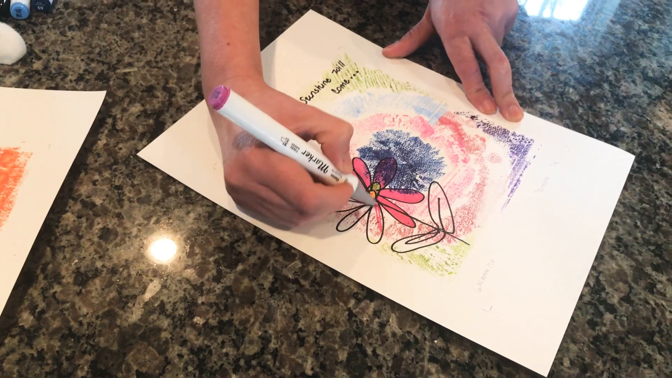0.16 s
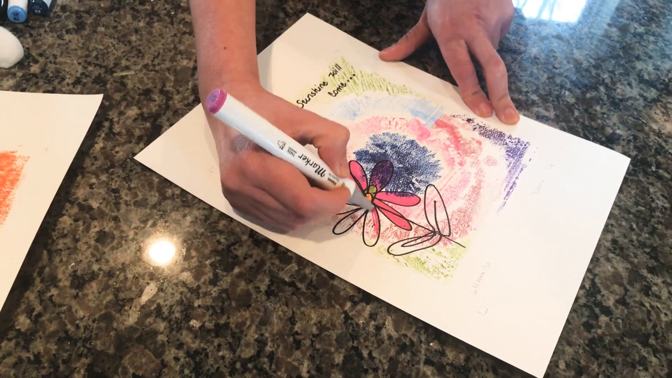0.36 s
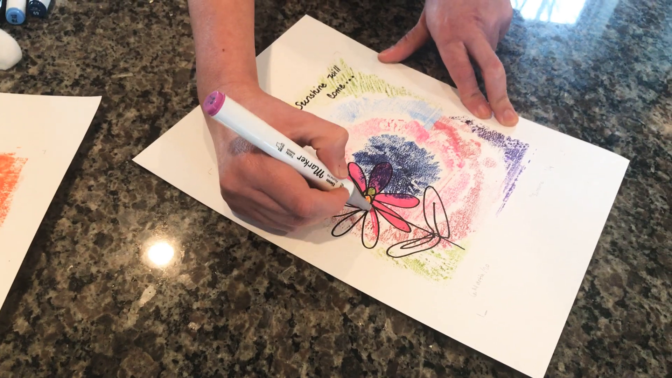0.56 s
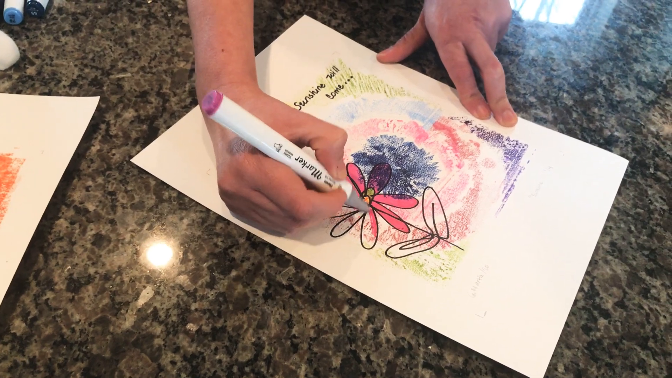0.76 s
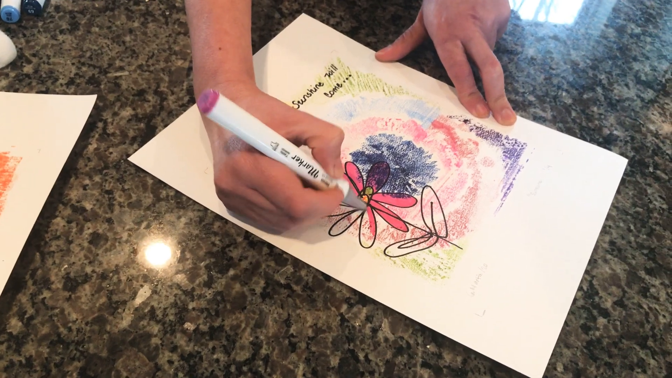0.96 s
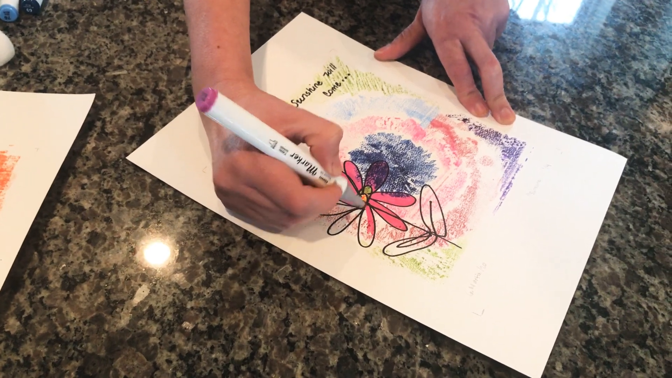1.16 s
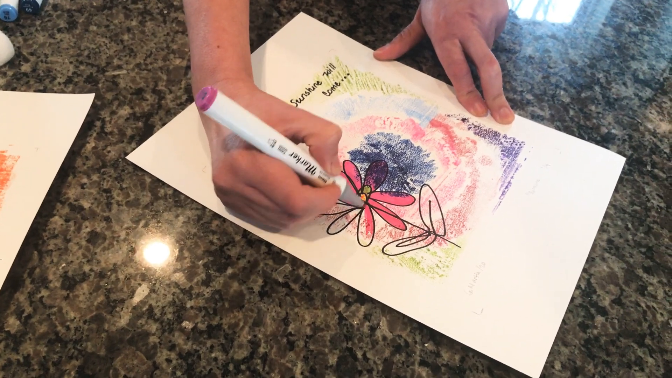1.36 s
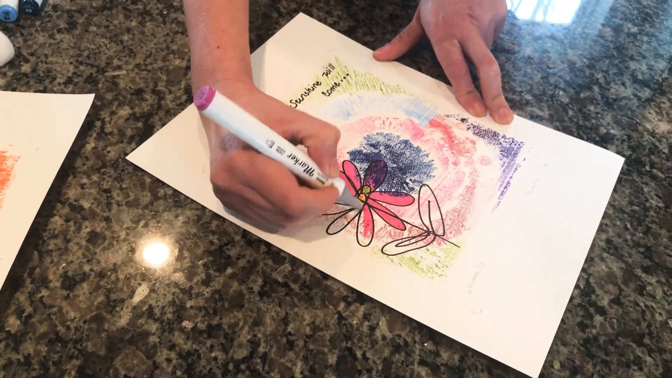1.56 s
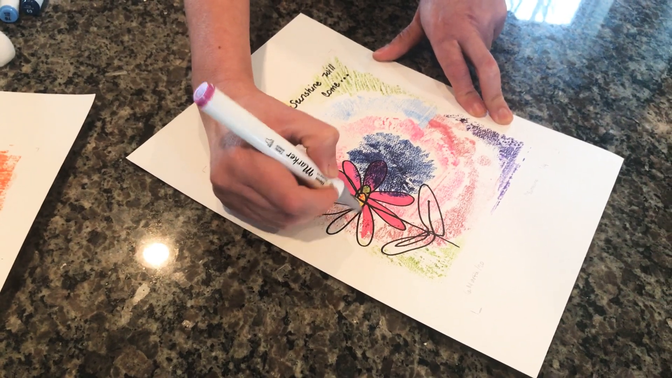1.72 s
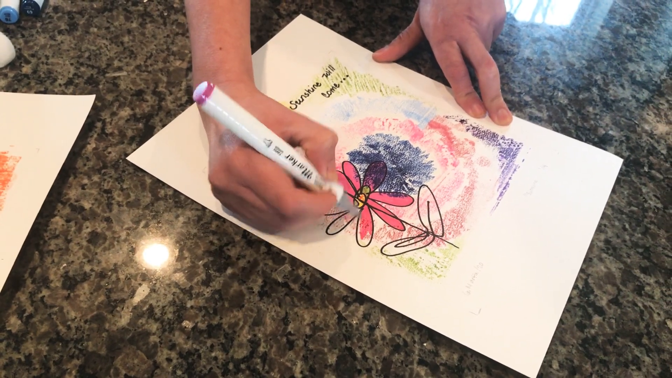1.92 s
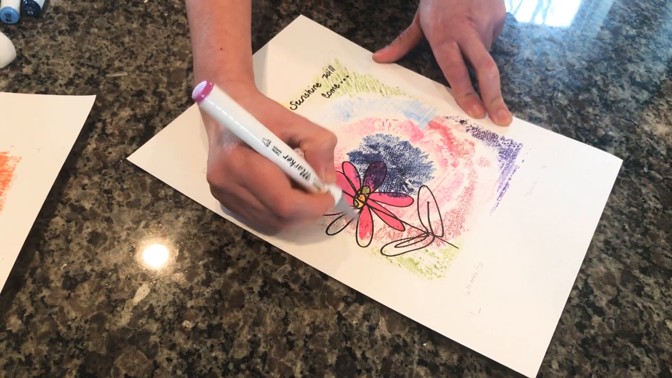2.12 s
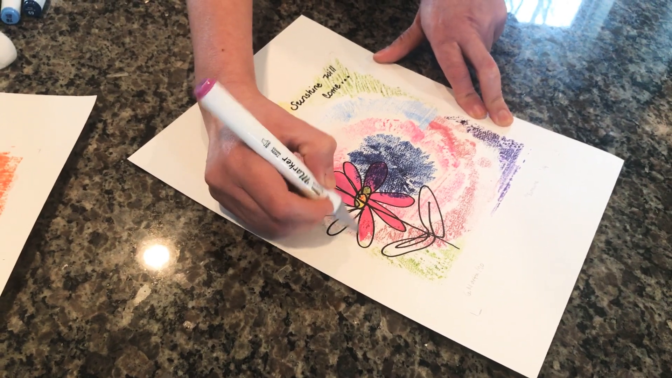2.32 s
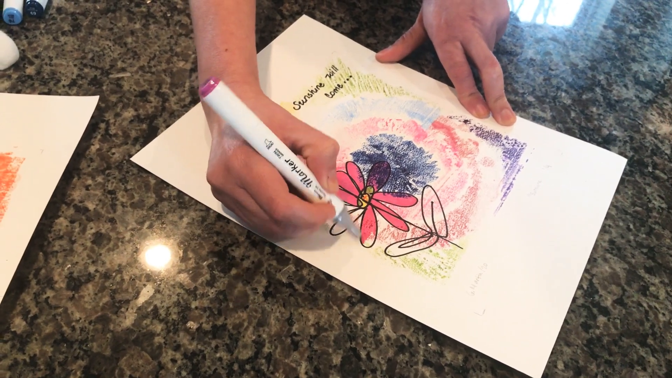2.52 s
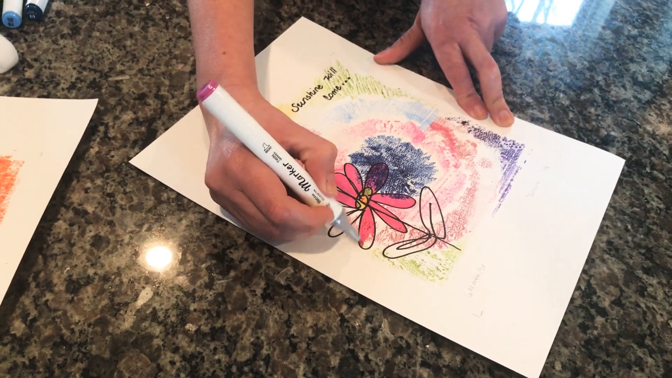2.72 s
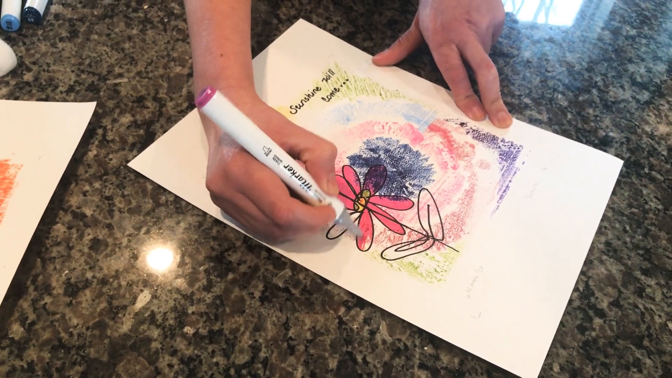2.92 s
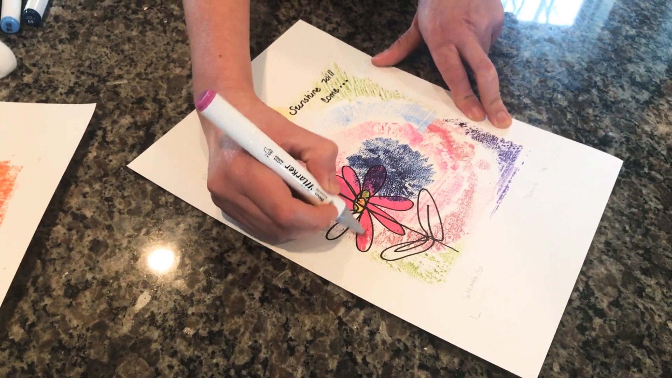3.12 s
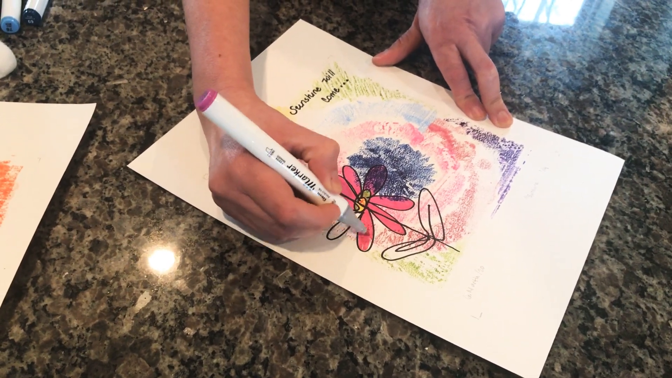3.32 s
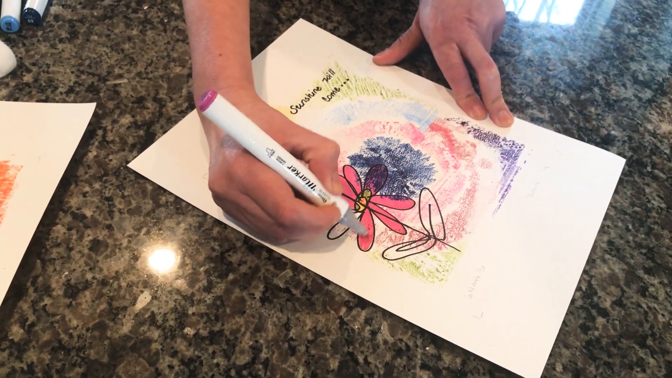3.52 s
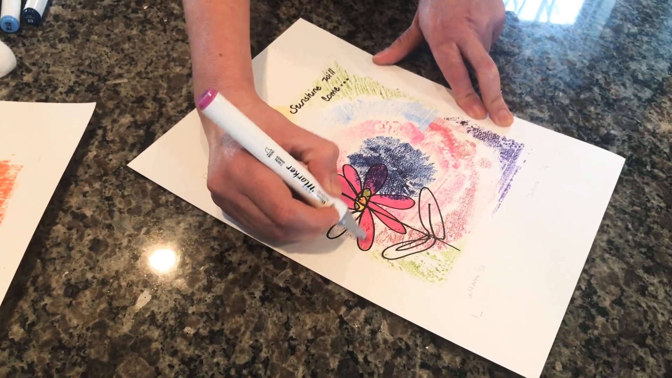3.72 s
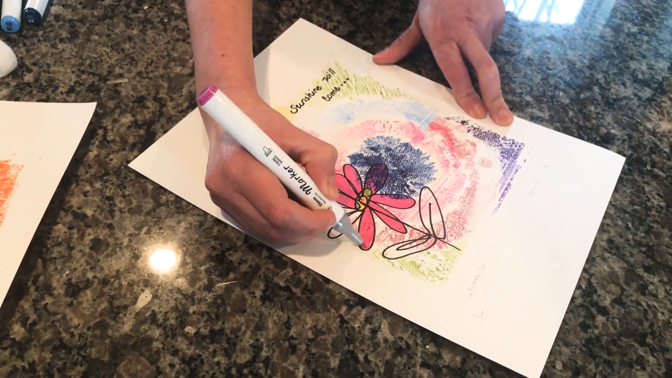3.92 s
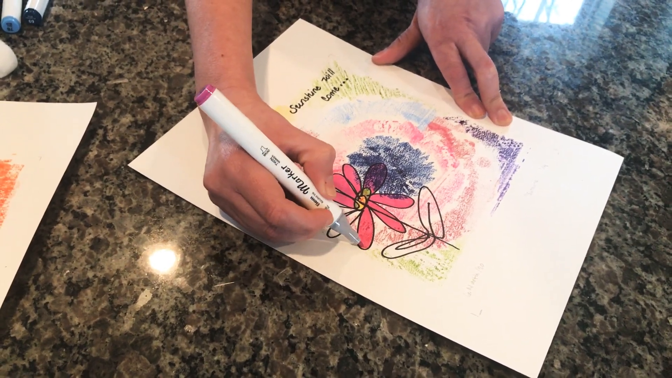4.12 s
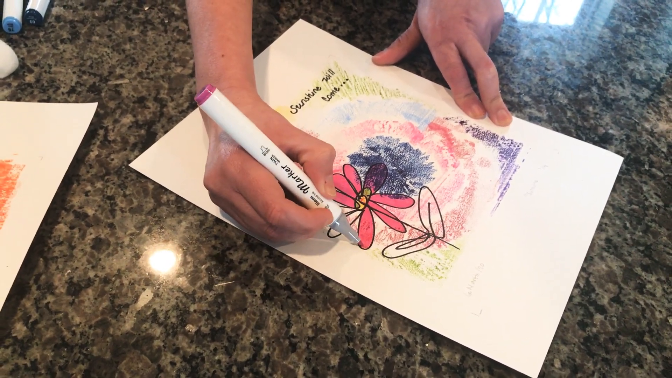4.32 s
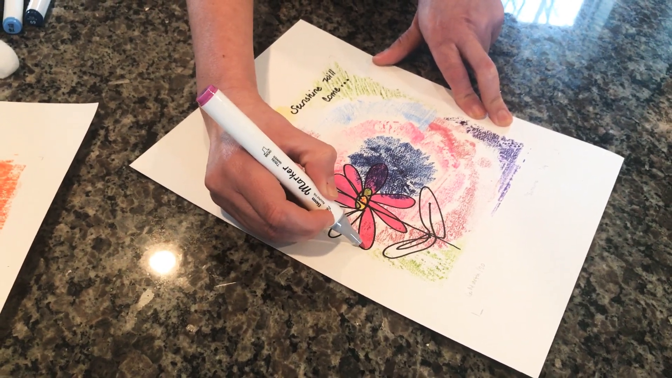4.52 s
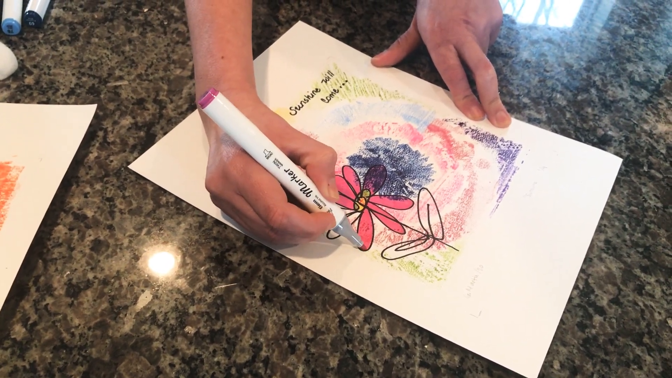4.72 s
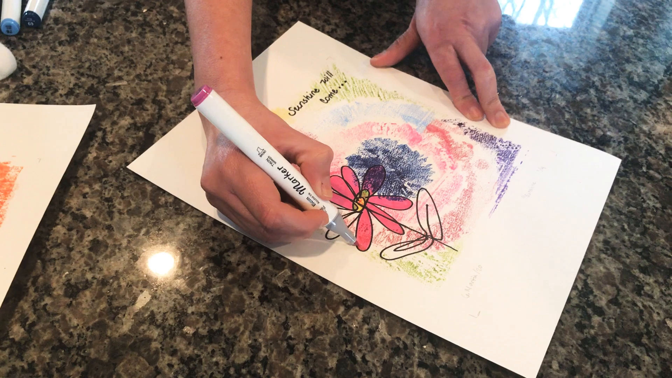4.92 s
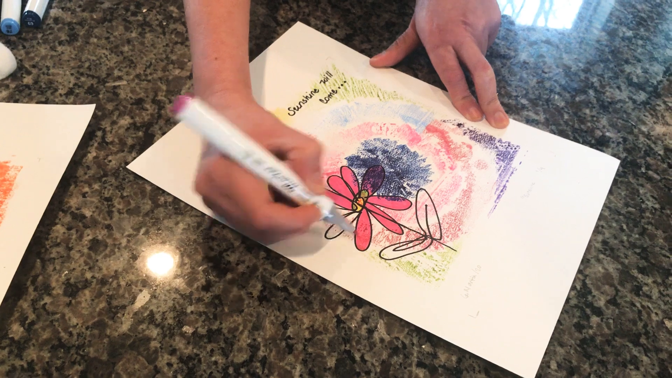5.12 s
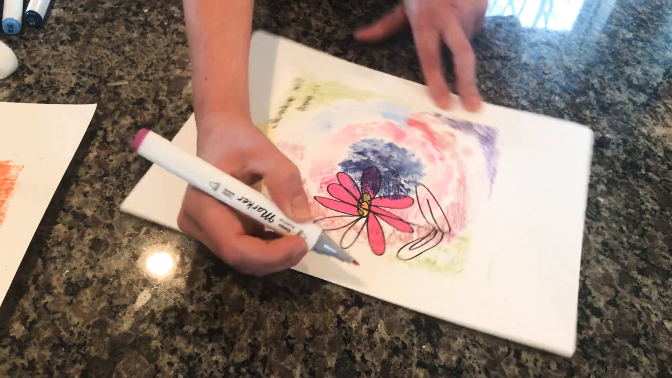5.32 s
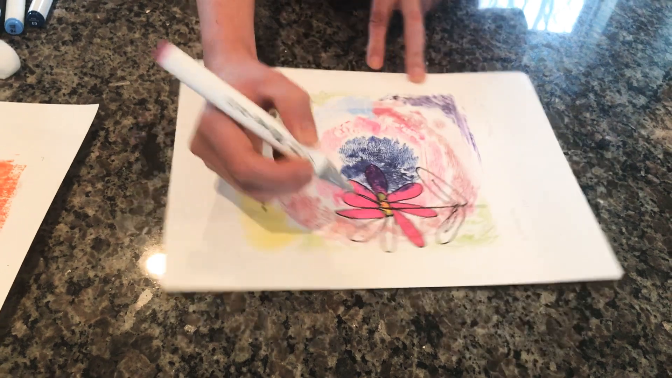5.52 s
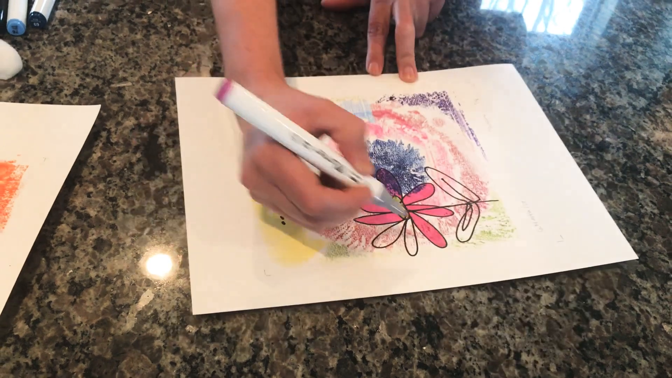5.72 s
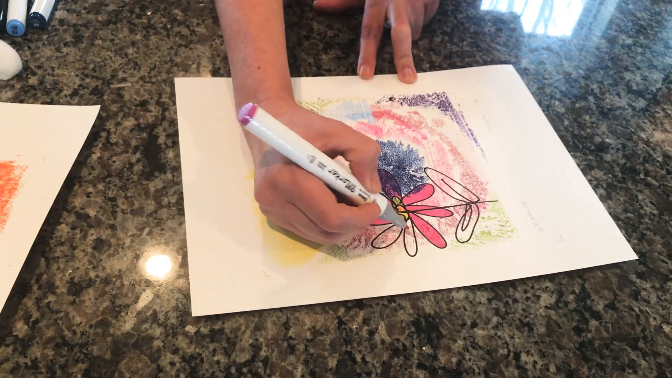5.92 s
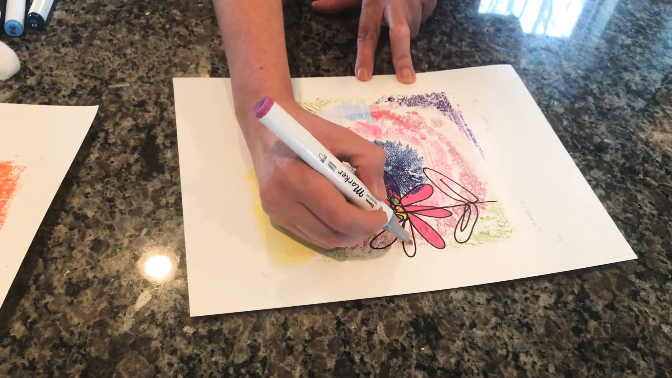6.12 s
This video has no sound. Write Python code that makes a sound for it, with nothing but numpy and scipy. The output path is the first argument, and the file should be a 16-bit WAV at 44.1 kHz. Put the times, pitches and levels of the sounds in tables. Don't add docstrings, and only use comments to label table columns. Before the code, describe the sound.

Close to the microphone in a quiet room, a felt-tip marker rubs paper on a stone counter in fast, even back-and-forth strokes, bright and scratchy. The strokes soften, then give way to faint separate dabs. The sheet is turned with a short rubbing swish and thin whistle, the tip lands with a crisp tap, and the paper settles before a last few tiny touches. A very faint watch ticks over soft hiss.

```python
import sys
import numpy as np
from scipy import signal
from scipy.fft import rfft, irfft
from scipy.io import wavfile

SR = 44100
rng = np.random.default_rng(int(sys.argv[2]) if len(sys.argv) > 2 else 0)


def volts(x):
    e = np.asarray(x, float) / 20
    return 10 ** e


def bounce(signal):
    frames = np.transpose(np.atleast_2d(signal))
    limited = np.clip(frames, -1, 1)
    pcm = np.round(limited * 32767).astype(np.int16)
    wavfile.write(sys.argv[1], SR, pcm)


N = 276066

# freq_hz, density_db
ROOM_COLOUR = [(22, -20.5), (53, 2), (123, -4), (248, -7.5), (370, -7.5), (470, -13.5), (802, -17),
               (949, -17), (1660, -22.5), (3250, -24), (7730, -27.5), (10800, -27.5), (16000, -24.5)]
# freq_hz, width_hz, rms_db
WHINES = [(120, 6, -82), (195, 30, -86)]
# start_s, length_s, ring_db, sag_db, hiss_over_ring_db
OUT_STROKES = [(0.049, 0.089, -43.5, 15.5, -5), (0.265, 0.086, -45.3, 12.5, -5),
               (0.472, 0.079, -43, 15.5, -9.1), (0.676, 0.067, -46, 11, -6),
               (0.849, 0.087, -42.5, 12.5, -7.5), (1.047, 0.09, -42, 1, -5.5),
               (1.262, 0.093, -41, -1.5, -6.5), (1.47, 0.091, -42, 11.5, -6), (1.671, 0.097, -44, 15.5, -6),
               (1.878, 0.1, -43.5, 15.7, -6.5), (2.082, 0.095, -43.5, 5, -7), (2.296, 0.099, -42.5, 8, -8),
               (2.507, 0.11, -45.5, 19, -9.5), (2.714, 0.1, -52.5, 28.5, -7.2),
               (2.908, 0.094, -55, 16, -6.5), (3.086, 0.081, -50.4, 22, -9), (3.27, 0.084, -51, 13.5, -7.5),
               (3.45, 0.075, -49.5, 14, -10), (3.624, 0.098, -53.3, 16, -10.5),
               (3.808, 0.082, -51, 10, -13)]
# start_s, length_s, ring_db, sag_db, hiss_over_ring_db
BACK_STROKES = [(-0.05, 0.081, -44, -6, -8), (0.144, 0.095, -47.5, -6, -7.8), (0.361, 0.085, -46, -15, -10),
                (0.565, 0.089, -47, -3, -7.5), (0.746, 0.082, -46.5, -5.8, -7),
                (0.938, 0.086, -45.5, -11, -7.5), (1.14, 0.1, -46.5, -7.8, -9),
                (1.357, 0.092, -44.9, -8.2, -8.7), (1.561, 0.092, -46, -5, -8.5),
                (1.769, 0.093, -45.5, -1, -9), (1.98, 0.088, -48, -5, -7), (2.181, 0.095, -48, -12, -8.0),
                (2.399, 0.086, -48.5, -14, -9.5), (2.612, 0.074, -48.5, -10, -12),
                (2.82, 0.081, -52.5, 15, -13.4), (2.992, 0.073, -48.5, -8, -13),
                (3.175, 0.074, -47.5, -13, -12.1), (3.349, 0.079, -49.4, -7, -13.5),
                (3.519, 0.087, -50.3, -3, -15), (3.713, 0.084, -52, 3, -14)]
# peak_s, rise_s, fall_s, ring_db, hiss_over_ring_db
DABS = [(3.955, 0.11, 0.08, -71.5, 0), (4.037, 0.006, 0.04, -55, -11), (4.102, 0.051, 0.048, -70, 2),
        (4.218, 0.011, 0.053, -59.5, -7), (4.355, .03, 0.054, -83, 5), (4.518, 0.022, .05, -66.5, -3),
        (4.67, .02, 0.048, -74.5, 0), (4.735, .06, 0.056, -75, -4), (4.868, .012, 0.073, -69, 2),
        (4.98, 0.042, .12, -75, -3), (5.056, .035, 0.12, -69.5, -13), (5.128, 0.059, 0.072, -56, -14),
        (6.206, .009, 0.02, -60, -2), (6.245, .007, .04, -57, -9), (6.258, .022, .04, -47.5, -10)]
# freq_hz, width_hz, level_db
BARREL_MODES = [(6010, 480, -8.5), (6516, 230, -5.5), (6950, 203, -1), (7350, 223, -2.5), (8350, 330, -8),
                (8886, 530, -5.5), (9390, 210, -11)]
# freq_hz, width_hz, level_db
PAPER_MODES = [(2840, 720, -4), (3156, 560, -1), (3800, 410, -9.5), (4636, 470, 0.5), (4820, 620, -8.5)]
# freq_hz, density_db
FIBRE_COLOUR = [(9500, -1.5), (10500, -6.5), (11500, -3.5), (13000, -2), (15000, -0.5), (16500, 0.5)]
# freq_hz, density_db
BRUSH_COLOUR = [(3600, -13.5), (4700, -4.5), (5400, -2), (6600, 7), (7800, -0.5), (10000, -9)]
# freq_hz, density_db
COUNTER_COLOUR = [(700, -18.5), (1400, -4.0), (2400, -4.5)]
# centre_s, length_s, level_db
THUMPS = [
    (2.94, .022, -68),
    (5.56, .02, -68),
    (5.62, .03, -68),
]
# freq_hz, density_db
HAND_COLOUR = [(30, -3), (180, -2), (450, -9)]
# time_s, peak_db, centre_hz, t60_s
SNAPS = [(5.299, -52, 12000, 0.0027), (5.429, -49, 8800, 0.0028), (5.907, -50, 9500, 0.0034),
         (5.9105, -40, 4600, 0.013), (5.9107, -46, 21000, .012), (5.9108, -63, 900, .015),
         (5.9133, -46, 5600, 0.01), (4.032, -52, 5000, .02), (4.213, -54, 5600, .05),
         (4.349, -57, 16000, .004), (6.203, -53, 6700, .02), (5.921, -56, 5400, .012),
         (6.0202, -56, 28000, .007)]
# time_s, level_db
SLIDE_SPEED = [
    (5.2, -78),
    (5.292, -69.5),
    (5.3, -62),
    (5.385, -60.5),
    (5.42, -55),
    (5.46, -61),
    (5.535, -61.5),
    (5.56, -61.5),
    (5.72, -78),
]
# freq_hz, density_db
SLIDE_COLOUR = [(2060, -11), (3500, -5), (4860, -7), (5780, -3), (8000, -9.5), (10400, -37), (17600, -120)]
# freq_hz, density_db
AIR_COLOUR = [(7500, -19.5), (8500, -6.0), (12000, -2.0), (16500, -1)]
# freq_hz, density_db
DRAG_COLOUR = [(600, -2), (1000, -1), (2200, -1)]
# freq_hz, width_hz
EDGE_MODES = [(2950, 650), (3250, 190)]
# peak_s, rise_s, fall_s, level_db
SETTLE = [
    (5.93, .01, .25, -74),
    (6.068, .05, .26, -68.5),
]
# freq_hz, density_db
SETTLE_COLOUR = [(530, -16), (900, -6), (1400, -13), (1960, -2.5), (2360, -8), (3850, -5.5), (5210, -12),
                 (6200, -9), (12000, -22.5), (15600, -51), (22000, -120)]

FIRM_DB = -43.5


def rms_one(x):
    return x / np.sqrt(np.mean(x ** 2) + 1e-20)


def noise():
    return rng.standard_normal(N)


def drift(rate_hz):
    r = np.exp(-2 * np.pi * rate_hz / SR)
    slow = signal.lfilter([1], [1, -2 * r, r * r], rng.standard_normal(N + SR))
    return rms_one(slow[SR:])


def coloured(x, spectrum):
    hz, db = np.transpose(spectrum)
    grid = np.maximum(np.fft.rfftfreq(N, 1 / SR), 1)
    gain = volts(np.interp(np.log(grid), np.log(hz), db, -90, -90))
    return rms_one(irfft(rfft(x) * gain, N))


def resonance(x, hz, width_hz):
    r = np.exp(-np.pi * width_hz / SR)
    poles = [1, -2 * r * np.cos(2 * np.pi * hz / SR), r * r]
    return signal.lfilter(np.array([1, 0, -1]) * (1 - r * r) / 2, poles, x)


def narrow_noise(hz, width_hz):
    once = resonance(noise(), hz, width_hz)
    return rms_one(resonance(once, hz, width_hz))


def swell(centre_s, length_s, db):
    return volts(db) * np.exp(-((np.arange(N) / SR - centre_s) / length_s) ** 2)


def touch(peak_s, rise_s, fall_s, db):
    since = np.arange(N) / SR - peak_s
    distance = np.where(since < 0, -since / rise_s, since / fall_s)
    return volts(db - 34 * np.minimum(distance, 3) ** 1.5)


def burst(at_s, peak_db, low_hz, high_hz, t60):
    crack = rng.standard_normal(2000) * volts(-60 * np.arange(2000) / SR / t60)
    band = signal.butter(2, [low_hz, min(high_hz, .45 * SR)], "band", fs=SR, output="sos")
    crack = signal.sosfilt(band, crack)
    out = np.zeros(N)
    out[round(at_s * SR):][:len(crack)] = volts(peak_db) * crack / np.abs(crack).max()
    return out


def room_floor():
    tones = sum(volts(db) * narrow_noise(hz, width) for hz, width, db in WHINES)
    lamp_hz = 10730 + 45 * drift(60)
    lamp = volts(-86.5 + 2.0 * drift(15)) * np.sin(2 * np.pi * np.cumsum(lamp_hz) / SR)
    return volts(-69.5) * coloured(noise(), ROOM_COLOUR) + tones + lamp


def catches(per_s, spread_db):
    sizes = volts(spread_db * np.minimum(rng.exponential(1, N), 4)) * rng.choice([-1, 1], N)
    return rms_one(sizes * (rng.random(N) < per_s / SR))


def body(modes, shared, own_share, per_s, spread_db, wander_db):
    total = np.zeros(N)
    for k, (hz, width, db) in enumerate(modes):
        strength = (-1) ** k * volts(db + wander_db * drift(14.0))
        drive = np.sqrt(1 - own_share) * shared + np.sqrt(own_share) * catches(per_s, spread_db)
        total += strength * resonance(drive, hz, width)
    return rms_one(total)


def stroke_gains(rows, slow_down_s, hiss_climb_db):
    speed_up_s, hiss_sag_share = 0.018, 0.58
    out, t = np.zeros((2, N)), np.arange(N) / SR
    for start, length, db, sag_db, hiss_db in rows:
        part = slice(max(int(start * SR), 0), int((start + length) * SR))
        since = t[part] - start
        speed = np.clip(since / speed_up_s, 0, 1) * np.clip((length - since) / slow_down_s, 0, 1)
        along = since / length - .5
        out[0, part] += speed * volts(db - sag_db * along)
        out[1, part] += speed * volts(db + hiss_db + (hiss_climb_db - hiss_sag_share * sag_db) * along)
    return out


def followed(firm, light, light_db, under_db, follows):
    pressure = (firm + volts(light_db) * light) / volts(FIRM_DB)
    return volts(FIRM_DB + under_db) * pressure ** follows


def marker():
    firm = stroke_gains(OUT_STROKES, slow_down_s=0.029, hiss_climb_db=-2.5)
    firm = firm + stroke_gains(BACK_STROKES, slow_down_s=.026, hiss_climb_db=7)
    light = np.zeros((2, N))
    for peak_s, rise_s, fall_s, db, hiss_db in DABS:
        light += touch(peak_s, rise_s, fall_s, db) * volts(np.array([[0], [hiss_db]]))
    fibre_gain = firm[1] + light[1]
    sheet_gain = followed(firm[0], light[0], light_db=-2.5, under_db=-11.5, follows=0.57)
    counter_gain = followed(firm[0], light[0], light_db=-5, under_db=-31.5, follows=0.29)

    shared = catches(5000, 2.9)
    bite = volts(0.92 * drift(120))
    barrel = body(BARREL_MODES, shared, own_share=.4, per_s=6000, spread_db=2.5, wander_db=1.4)
    sheet = body(PAPER_MODES, shared, own_share=0.63, per_s=5000, spread_db=3.15, wander_db=3.0)
    sheet = signal.sosfilt(signal.butter(6, 2450, "high", fs=SR, output="sos"), sheet)
    fibres = coloured(catches(9000, 3.7) + 1.1 * shared, FIBRE_COLOUR)
    brush = coloured(catches(9000, 1.9), BRUSH_COLOUR)
    rub = coloured(noise(), COUNTER_COLOUR)

    voiced = (firm[0] + .7 * light[0]) * barrel + 0.66 * light[0] * brush
    mix = volts(-0.16) * voiced + volts(-0.5) * sheet_gain * sheet
    return bite * (mix + counter_gain * rub + volts(1.2) * fibre_gain * fibres)


def watch():
    first_s, period_s = .0546, .10243
    out = np.zeros(N)
    for beat_s in np.arange(first_s, N / SR - .05, period_s):
        out += burst(beat_s, -59.5 + 2.5 * rng.standard_normal(), 13600, 18000, .007)
    return out


def hand():
    return sum(swell(*row) for row in THUMPS) * coloured(noise(), HAND_COLOUR)


def paper_snaps():
    return sum(burst(s, db, 0.4 * hz, 1.7 * hz, t60) for s, db, hz, t60 in SNAPS)


def turning_sheet():
    speed = volts(np.interp(np.arange(N) / SR, *np.transpose(SLIDE_SPEED), -120, -120))
    level, air = volts(-7) * speed, volts(-3) * speed
    grain = catches(14000, 2.5) * volts(.8 * drift(40))
    hiss = level * coloured(grain, SLIDE_COLOUR) + air * coloured(grain, AIR_COLOUR)
    drag = level * volts(-13.5) * coloured(noise(), DRAG_COLOUR)
    rub_tone, whistle_tone = [narrow_noise(hz, width) for hz, width in EDGE_MODES]
    rub = swell(centre_s=5.345, length_s=.075, db=-71) * rub_tone
    whistle = swell(centre_s=5.52, length_s=.15, db=-74) * whistle_tone
    settle = sum(touch(*row) for row in SETTLE) * coloured(noise(), SETTLE_COLOUR)
    return hiss + drag + rub + whistle + settle


def reflections(x):
    t60_s, tail_db = 0.22, -14.5
    t = np.arange(int(.25 * SR)) / SR
    tail = rng.standard_normal(len(t)) * volts(-60 * t / t60_s) * (t > .004)
    tail = signal.sosfilt(signal.butter(1, 8000, fs=SR, output="sos"), tail)
    return volts(tail_db) * signal.fftconvolve(x, tail / np.sqrt(np.sum(tail ** 2)))[:N]


def scene():
    near = marker() + watch() + hand() + paper_snaps() + turning_sheet()
    return (near + reflections(near) + room_floor())[None]


def top_cut(x):
    return signal.sosfilt(signal.butter(12, 16880, fs=SR, output="sos"), x)


def record(dry):
    low_pass = signal.ellip(12, .5, 50, 15760, fs=SR, output="sos")
    cut = signal.sosfilt(low_pass, dry)
    return top_cut(cut)


dry = scene()
out = record(dry)
bounce(out)
```